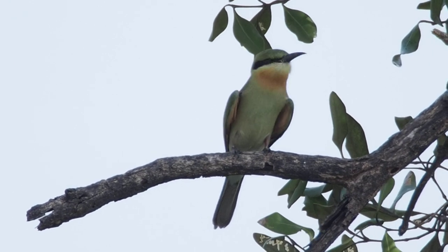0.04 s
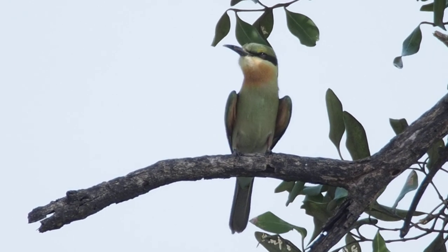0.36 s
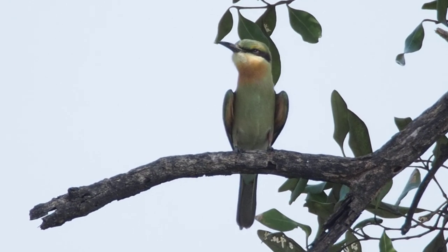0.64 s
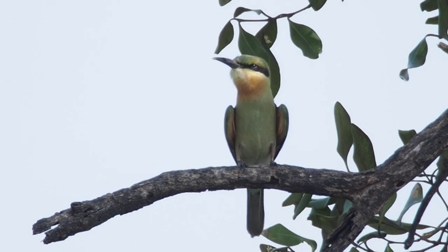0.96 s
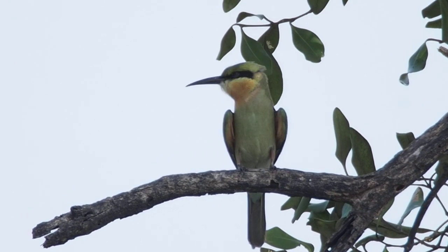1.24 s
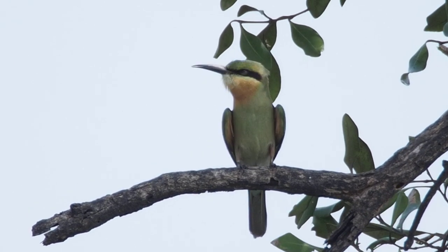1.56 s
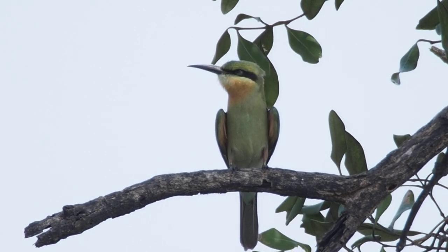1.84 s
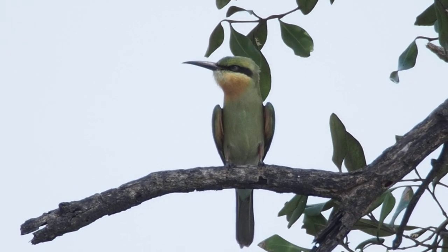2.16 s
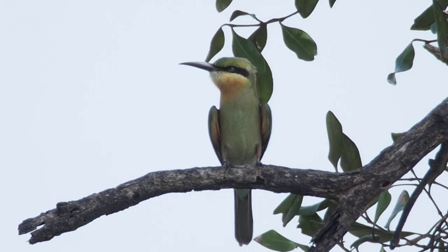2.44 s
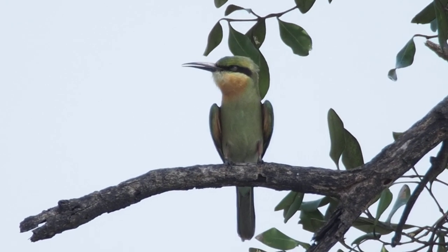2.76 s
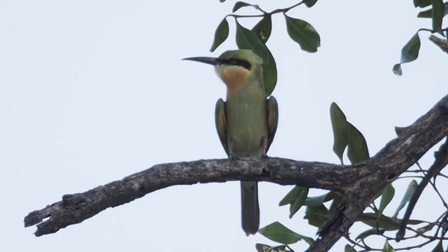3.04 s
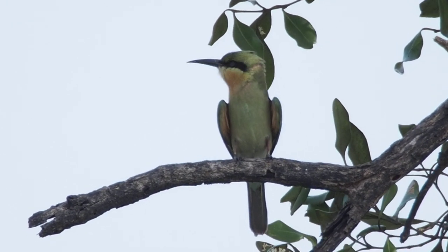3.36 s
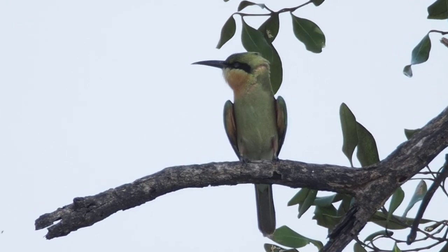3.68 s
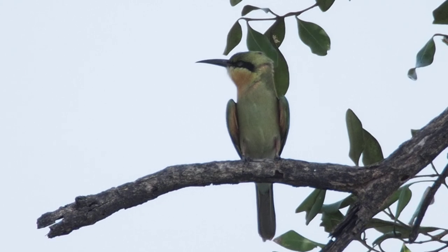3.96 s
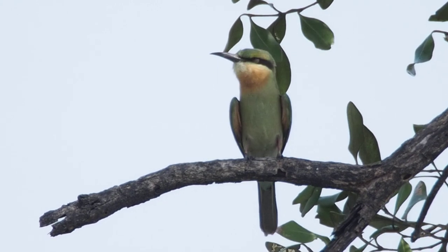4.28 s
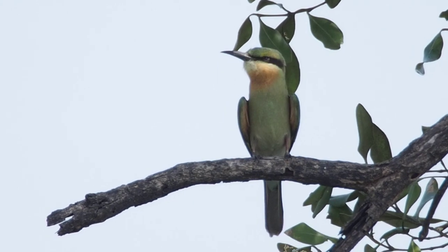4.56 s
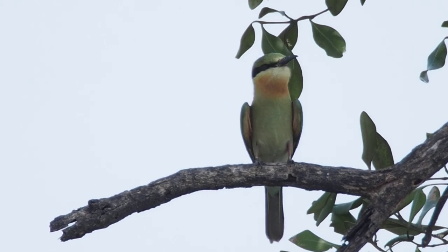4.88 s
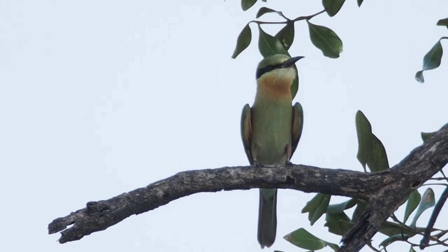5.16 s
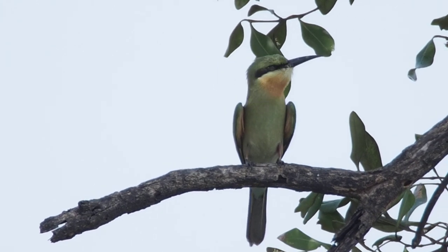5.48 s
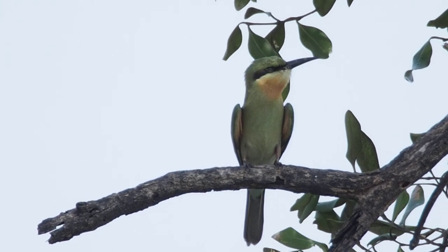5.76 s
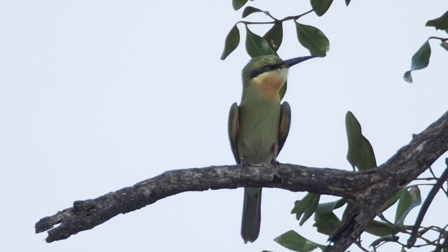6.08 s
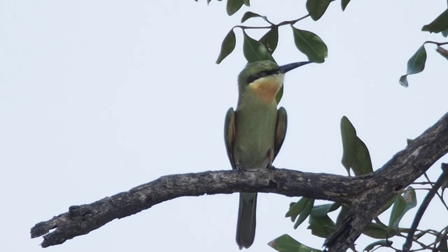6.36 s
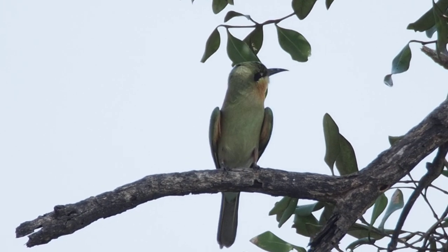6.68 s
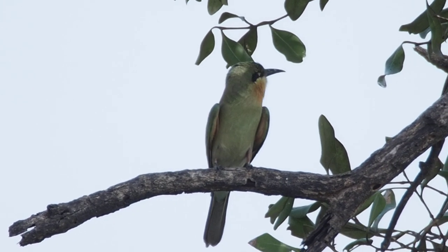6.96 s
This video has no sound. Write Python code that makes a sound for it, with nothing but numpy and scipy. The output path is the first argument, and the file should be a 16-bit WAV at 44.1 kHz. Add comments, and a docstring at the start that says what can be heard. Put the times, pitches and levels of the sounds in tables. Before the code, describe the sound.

A bird whistles short arched calls outdoors while others answer, twitter, rasp and tick over soft wind rumble.

```python
"""Bee-eaters in a tree

A near bird whistles in arches over a soft twitter, a second answers, a third rasps in puffs through its
throat. A small bird on the right ticks in pairs, each tick a tiny whistle; faint chirps come from afar.
Branches throw back short echoes. Gusts rumble, mostly on the right microphone, over a quiet wash."""
import sys
import numpy as np
from scipy import signal
from scipy.fft import rfft, irfft, next_fast_len
from scipy.io import wavfile
from scipy.ndimage import uniform_filter1d

SR = 44100
rng = np.random.default_rng(int(sys.argv[2]) if len(sys.argv) > 2 else 0)


def output_pcm(signal):
    """Save a mono or channel-first signal as 16-bit PCM at the path in sys.argv[1].

    Samples are clipped to [-1, 1] before scaling.
    """
    pcm = np.clip(np.atleast_2d(signal).T, -1, 1) * 32767
    wavfile.write(sys.argv[1], SR, np.round(pcm).astype(np.int16))


N = 318402


def amp(db):
    """Decibels to gain."""
    return 10 ** (np.asarray(db) / 20)


def unit(x):
    """Scales to rms 1."""
    return x / np.sqrt(np.mean(x ** 2) + 1e-20)


def read(points, hz):
    """Interpolates a table on a log-frequency axis."""
    f, value = np.transpose(points)
    return np.interp(np.log(hz + 1), np.log(f + 1), value)


def add(mix, start_s, sound):
    """Mixes a sound in at start_s."""
    part = mix[max(round(start_s * SR), 0):][:len(sound)]
    part += sound[:len(part)]


def drift(count, rate_hz):
    """Smooth random motion of rms about 1, rolling off at rate_hz."""
    hz = np.fft.rfftfreq(count + 4096, 1 / SR)
    white = rfft(rng.standard_normal(count + 4096))
    return unit(irfft(white * np.exp(-(hz / rate_hz) ** 2)))[:count]


def delayed(x, delay_s, fft_size=327680):
    """Fractional-sample delay."""
    hz = np.fft.rfftfreq(fft_size, 1 / SR)
    return irfft(rfft(x, fft_size) * np.exp(-2j * np.pi * hz * delay_s))[:N]


def coloured(spectrum):
    """Two independent noises with a given spectrum."""
    size = next_fast_len(N, True)
    gain = amp(read(spectrum, np.fft.rfftfreq(size, 1 / SR)))
    return unit(irfft(rfft(rng.standard_normal((2, size))) * gain, size)[:, :N])


# Outdoor wash and microphone hiss. Each row: frequency in Hz, relative density in dB.
WASH_SPECTRUM = [(20, -19), (60, 1.5), (105, -3.5), (145, 1), (280, -6.5), (380, -3), (500, -9), (650, -4),
                 (850, -6), (1000, -2), (1300, -14.5), (1750, -8), (3800, -12.5), (6500, -22.5),
                 (12500, -20.5), (16000, -22)]
# Its stereo width. Each row: frequency in Hz, left-right correlation.
WASH_CORRELATION = [(100, 1), (600, 0.33), (2000, 0.033), (6000, 0), (12000, 0.013)]
# Its balance. Each row: frequency in Hz, left minus right in dB.
WASH_PAN = [(100, 10.5), (400, -.5), (2400, .5), (8000, 1), (15000, 1.5)]


def wash(level_db=-54):
    """Steady distant outdoor noise, running into hiss at the top."""
    left, independent = rfft(coloured(WASH_SPECTRUM))
    hz = np.fft.rfftfreq(N, 1 / SR)
    correlation = np.clip(read(WASH_CORRELATION, hz), -1, 1)
    right = correlation * left + np.sqrt(1 - correlation ** 2) * independent
    lean_db = read(WASH_PAN, hz) / 2
    return irfft(np.array([left * amp(lean_db), right * amp(-lean_db)]), N) * amp(level_db)


# Breeze at the microphones. Each row: time in seconds, strength in dB.
BREEZE_CURVE = [(0, -52.5), (.6, -52), (1.0, -61.5), (1.45, -54.5), (1.75, -61), (2.7, -56), (3.2, -46.5),
                (3.7, -48.5), (3.95, -56), (4.15, -49), (4.35, -53), (4.75, -52), (5.2, -46.5), (5.8, -53),
                (6.12, -50.5), (6.65, -58.5), (7.22, -57.5)]
# Gusts on top of it. Each row: start in seconds, relative peak in dB.
GUST_PEAKS = [(0.223, -44), (0.708, -44.5), (2.934, -39), (3.141, -34.5), (3.282, -37.5), (3.379, -43.5),
              (3.456, -37), (3.65, -40.5), (4.068, -39), (4.184, -37), (4.414, -38.5), (4.52, -38),
              (5.0, -38), (5.193, -39), (5.316, -38), (5.515, -37.5)]


def wind_strength_db(lumps_db=1.7, lumps_hz=12, gust_rise_s=.023, gust_trim_db=-5):
    """An uneven breeze, plus gusts that swell quickly and die more slowly."""
    breeze_db = np.interp(np.arange(N) / SR, *np.transpose(BREEZE_CURVE))
    power = amp(breeze_db + lumps_db * drift(N, lumps_hz)) ** 2
    age = np.arange(SR // 2) / SR / gust_rise_s
    for start_s, db in GUST_PEAKS:
        add(power, start_s, (amp(db + gust_trim_db) * age * np.exp(1 - age)) ** 2)
    return 10 * np.log10(power)


# Wind rumble. Each row: frequency in Hz, relative density in dB.
RUMBLE_SPECTRUM = [(20, -27), (45, -10), (70, -2), (115, 0), (170, -4), (250, -15.5), (400, -26.5),
                   (900, -60), (3000, -88)]
# Higher buffeting of hard gusts. Each row: frequency in Hz, relative density in dB.
BUFFET_SPECTRUM = [(60, -18), (200, -1), (400, -12), (900, -28), (3000, -60)]


def wind(left_db=-12, right_db=4, hard_gust_db=-38.5, rumble_slope=1.177, buffet_db=-19, buffet_slope=2.1):
    """Turbulence at each microphone port; hard gusts reach higher in pitch."""
    excess_db = wind_strength_db() - hard_gust_db
    rumble = coloured(RUMBLE_SPECTRUM) * amp(rumble_slope * excess_db)
    buffet = coloured(BUFFET_SPECTRUM) * amp(buffet_db + buffet_slope * excess_db)
    return (rumble + buffet) * amp(hard_gust_db) * amp([[left_db], [right_db]])


def whistle(hz, level_db, waver, second_db, third_db):
    """The syrinx: a slightly unsteady, nearly pure tone with two weak overtones."""
    phase = 2 * np.pi * np.cumsum(hz * (1 + waver * drift(len(hz), 380))) / SR
    tone = np.sin(phase)
    for k, db in [(2, second_db), (3, third_db)]:
        tone += amp(db) * np.sin(k * phase) * (k * hz < SR / 2)
    return np.sqrt(2) * amp(level_db) * tone * signal.windows.tukey(len(hz), .1)


def arch(shape, length_s, top_hz, level_db, fall=1):
    """Stretches an arch over one note: pitch in Hz and level in dB per sample."""
    u = np.linspace(0, 1, max(round(length_s * SR), 64))
    at, pitch, db = np.transpose(shape)
    sag = 1 - uniform_filter1d(np.interp(u, at, pitch), len(u) // 12, mode="nearest")
    past_top = u > u[sag.argmin()]
    return top_hz * (1 - sag * np.where(past_top, fall, 1)), level_db + np.interp(u, at, db)


# Echoes off branches and leaves. Each row: frequency in Hz, T60 in seconds.
TREE_DECAY = [(2000, 0.11), (3500, 0.14), (8000, 0.13)]


def in_tree(x, pan_db, left_lag_s, twigs_db, twigs_decay_s, tail_db):
    """Direct sound (positive pan is left), scatter off the nearest branches and a short leafy tail."""
    direct = np.array([amp(pan_db / 2) * delayed(x, left_lag_s), amp(-pan_db / 2) * x])
    t = np.arange(SR // 3) / SR
    taps = rng.choice([-1., 1.], (2, len(t))) * (rng.random((2, len(t))) < 3000 / SR)  # 3000 echoes/s
    twigs = taps * (t > .006) * np.exp(-t / twigs_decay_s)
    hz, frame_s, spectra = signal.stft(taps * (t > .014), SR, nperseg=256)
    decay = amp(-60 * frame_s / read(TREE_DECAY, hz)[:, None])
    tail = signal.istft(spectra * decay, SR, nperseg=256)[1][:, :len(t)]
    echoes = sum(amp(db) * part / np.linalg.norm(part, axis=1, keepdims=True)
                 for db, part in [(twigs_db, twigs), (tail_db, tail)])
    return direct + signal.oaconvolve(x[None], echoes, axes=1)[:, :N]


# Arch of one tick. Each row: share of length, share of top pitch, relative level in dB.
TICK_SHAPE = [(0, 0.55, -22), (.1, 0.82, -6), (.2, 0.768, -1.5), (.3, 0.8, -5.5), (.42, 1, -14),
              (.56, 0.94, -15), (.7, .92, -17), (.83, 0.9, -9), (1, 0.4, -10)]
# Pairs of ticks. Each row: time in seconds, gap in seconds, level in dB, relative crack level in dB.
DOUBLE_TICKS = [(0.121, .1584, -37.5, -12), (1.4727, 0.16, -40.5, -7), (2.188, .1698, -38, -11),
                (2.959, 0.16, -40, -9), (3.4136, 0.15, -42.5, -15), (3.853, .1624, -41, -12),
                (4.3732, 0.16, -39, -10.5), (5.0621, .1585, -40.5, -23), (6.022, 0.18, -37.5, -18),
                (6.393, 0.17, -40, -14), (6.7436, .1507, -39.5, -19)]


def ticking_bird(length_s=.0088, top_hz=9550, second_tick_db=-.6, crack_rise_s=.0012):
    """Whistles so short and high that they are heard as ticks; the voice cracks on the way up."""
    out = np.zeros(N)
    age = np.arange(400) / SR / crack_rise_s
    band = signal.butter(3, [4300, 9200], "band", fs=SR, output="sos")
    ticks = []
    for time_s, gap_s, db, crack_db in DOUBLE_TICKS:
        ticks += [(time_s, db, crack_db), (time_s + gap_s, db + second_tick_db, crack_db)]
    for (time_s, db, crack_db), (stretch, tune) in zip(ticks, rng.standard_normal((len(ticks), 2))):
        note = arch(TICK_SHAPE, length_s * (1 + .05 * stretch), top_hz * (1 + .0087 * tune), db)
        add(out, time_s - .0009, whistle(*note, waver=.022, second_db=-45, third_db=-50))
        crack = unit(signal.sosfilt(band, rng.standard_normal(len(age)))) * age * np.exp(1 - age)
        add(out, time_s + .0008, amp(db + crack_db) * crack)
    return in_tree(out, pan_db=-5.5, left_lag_s=.00012, twigs_db=-8, twigs_decay_s=.011, tail_db=-21.5)


# Second bird's calls. Each row: start in seconds, length in seconds, top pitch in Hz, level in dB.
ANSWERS = [(0.254, 0.048, 3213, -49), (0.416, 0.046, 3020, -53.5), (2.467, 0.05, 3140, -50.5),
           (3.022, 0.065, 3157, -48.5), (3.517, 0.04, 3010, -51), (4.084, 0.054, 3110, -47.5),
           (4.67, 0.056, 3090, -46), (5.258, .058, 3160, -47.5), (5.775, 0.064, 3240, -47.5),
           (6.329, 0.06, 3130, -45), (6.838, 0.058, 3140, -46.5)]
# Their round arch. Each row: share of length, share of top pitch, relative level in dB.
ANSWER_SHAPE = [(0, .88, -2), (.1, .93, -2.5), (.24, 1, 0.5), (.4, 0.99, -5.5), (.56, 1, 0), (.72, .91, -1),
                (.88, .83, -2), (1, 0.73, -10)]


def answering_bird(full_fall_s=.0638, reflection_s=.0021, reflection_gain=.59):
    """Whistles from the right, the shorter falling less far; a reflection hollows them on the left."""
    out = np.zeros(N)
    for start_s, length_s, top_hz, db in ANSWERS:
        note = arch(ANSWER_SHAPE, length_s, top_hz, db, fall=length_s / full_fall_s)
        add(out, start_s, whistle(*note, waver=.0081, second_db=-51, third_db=-40))
    left, right = in_tree(out, pan_db=-5, left_lag_s=5e-5, twigs_db=-11.5, twigs_decay_s=.0069,
                          tail_db=-19)
    return np.array([left + reflection_gain * delayed(left, reflection_s), right])


def run_times(first_s, last_s, step_s):
    """Evenly spaced starts, about step_s apart."""
    return np.linspace(first_s, last_s, 1 + round(abs(last_s - first_s) / step_s))


def soft_notes(notes, waver, bend, fade_db=3):
    """Quiet whistles gliding through three pitches; a higher bend holds the middle one longer."""
    out = np.zeros(N)
    for start_s, length_s, first_hz, middle_hz, last_hz, db in notes:
        u = np.linspace(-1, 1, max(round(length_s * SR), 64))
        hz = middle_hz + (np.where(u < 0, first_hz, last_hz) - middle_hz) * abs(u) ** bend
        add(out, start_s, whistle(hz, db - fade_db * u ** 2, waver, second_db=-22, third_db=-22))
    return out


# Runs of pips. Each row: first start in seconds, last start in seconds, level in dB.
TWITTER_PIPS = [(0.484, 0.484, -58.5), (1.098, 1.14, -61.5), (1.552, 1.594, -57), (2.024, 2.072, -60),
                (2.888, 2.934, -59.5), (3.632, 3.668, -60), (4.277, 4.369, -61.5), (4.909, 4.995, -60.5),
                (7.078, 7.114, -61)]


def pips(step_s=.044, length_s=.023, low_hz=2142, high_hz=2253, flick_hz=160):
    """Low whistled pips, each a shallow dip in pitch, sinking a little along the run."""
    notes = []
    for first_s, last_s, db in TWITTER_PIPS:
        starts_s = run_times(first_s, last_s, step_s)
        for start_s, hz in zip(starts_s, np.linspace(low_hz, high_hz, len(starts_s))[::-1]):
            notes.append((start_s, length_s, hz + flick_hz, hz, hz + flick_hz, db))
    return soft_notes(notes, waver=.017, bend=2.9, fade_db=1.5)


# Endings of most runs. Each row: turn in seconds, low and top pitch in Hz, rise and fall level in dB.
TWITTER_FLOURISHES = [(0.542, 2240, 2920, -53.5, -52), (1.209, 2210, 2850, -55, -55),
                      (1.692, 2330, 2600, -53, -55.5), (2.171, 2298, 2350, -51.5, -54),
                      (3.012, 2200, 2700, -54.5, -59), (3.729, 2150, 2820, -55, -59),
                      (5.064, 2100, 2710, -57.5, -59.5), (7.174, 2190, 2890, -56.5, -52.5)]
# Their contour. Each row: share of length, share of the way from low to top, relative level in dB.
FLOURISH_CONTOUR = [(0, .2, -4), (.08, 0, 0), (.3, .14, 0), (.4, .9, -1), (.5, 1, -9), (.56, .85, -2),
                    (.62, .32, 1), (.78, .26, 1), (1, -.08, -4)]


def flourishes(length_s=.058):
    """A held low whistle flicks up, catches at the turn and slides back."""
    out = np.zeros(N)
    u = np.linspace(0, 1, round(length_s * SR))
    at, height, shape_db = np.transpose(FLOURISH_CONTOUR)
    for turn_s, low_hz, top_hz, rise_db, fall_db in TWITTER_FLOURISHES:
        hz = low_hz + (top_hz - low_hz) * np.interp(u, at, height)
        db = np.interp(u, at, shape_db) + np.where(u < .5, rise_db, fall_db)
        add(out, turn_s - length_s / 2, whistle(hz, db, waver=.012, second_db=-30, third_db=-27))
    return out


def twitter():
    """Low, clear phrases between the whistles: a few pips, then usually a flourish."""
    phrases = pips() + flourishes()
    return in_tree(phrases, pan_db=-1, left_lag_s=0, twigs_db=-19, twigs_decay_s=.016, tail_db=-11)


# Far-off chatter. Each row: first start in seconds, last start in seconds, level in dB.
CHATTER_RUNS = [(0.712, 0.793, -73), (1.205, 1.286, -73), (1.551, 1.629, -66.5)]


def distant_chatter(step_s=.02, length_s=.015, glide_hz=(7220, 6120, 4560)):
    """Short runs of thin, high, falling whistles."""
    notes = [(start_s, length_s, *glide_hz, db)
             for first_s, last_s, db in CHATTER_RUNS for start_s in run_times(first_s, last_s, step_s)]
    chatter = soft_notes(notes, waver=.009, bend=1.03)
    return in_tree(chatter, pan_db=4, left_lag_s=0, twigs_db=-6, twigs_decay_s=.006, tail_db=-15)


# Near bird's calls. Each row: start and length in seconds, top pitch in Hz, level in dB, fall factor.
NEAR_WHISTLES = [(0.942, 0.073, 3277, -37, 1.05), (1.471, 0.074, 3350, -36, 0.99),
                 (1.935, 0.075, 3353, -35.5, 1.14), (2.801, 0.071, 3316, -36.5, 1.18),
                 (3.461, 0.079, 3287, -38, 0.97), (4.141, 0.077, 3290, -40, 1.05),
                 (4.808, 0.073, 3262, -36, 1.18), (6.877, 0.063, 2925, -40, 0.87)]
# Their quick rise and long fall. Each row: share of length, share of top pitch, relative level in dB.
NEAR_SHAPE = [(0, .77, -10.5), (.1, .9, -9.5), (.22, .985, -6.5), (.35, 1, -2.5), (.52, .94, -5),
              (.68, .85, -5), (.86, 0.78, -17.5), (1, 0.788, -13)]


def near_bird(bough_s=.012, bough_db=-14):
    """Loud arched whistles that turn hoarse as they fall; an echo off a bough beats against them."""
    out = np.zeros(N)
    for start_s, *note in NEAR_WHISTLES:
        hz, db = arch(NEAR_SHAPE, *note)
        third_db = np.interp(hz, [2500, 2850, 3150], [-30, -21.5, -34])  # the beak favours 8.5 kHz
        flutter_db = 3.5 * np.linspace(0, 1, len(hz)) ** 2 * drift(len(hz), 400)
        add(out, start_s, whistle(hz, db + flutter_db, waver=.0013, second_db=-35, third_db=third_db))
    out += amp(bough_db) * delayed(out, bough_s)
    return in_tree(out, pan_db=-2.5, left_lag_s=-1.7e-5, twigs_db=-13.5, twigs_decay_s=.0059,
                   tail_db=-16.5)


# Third bird's harsh notes. Each row: start in seconds, centre in Hz, level in dB.
RASP_NOTES = [(2.089, 2410, -49), (2.356, 3340, -50.5), (2.670, 2540, -44.5), (2.776, 3103, -45),
              (2.826, 2540, -47.5), (3.051, 2570, -45), (3.148, 3200, -49), (3.194, 2580, -47),
              (3.415, 2500, -45.5), (3.525, 3127, -49), (3.573, 2550, -47.5), (3.764, 2580, -47),
              (3.870, 3200, -51), (3.923, 2620, -48.5)]


def rasping_bird(length_s=.055, pulse_hz=300, jitter=.14, core_hz=850, skirt_hz=2200, skirt_db=-8):
    """Uneven puffs, some hundreds a second, through one resonance of the throat."""
    out = np.zeros(N)
    count = round(length_s * SR)
    for start_s, centre_hz, db in RASP_NOTES:
        cycles = np.cumsum(pulse_hz * (1 + jitter * drift(count, 200))) / SR
        puffs = np.exp(-2 * (cycles % 1)) * rng.standard_normal(count)
        rasp = np.zeros(count)
        for width_hz, band_db in [(core_hz, 0), (skirt_hz, skirt_db)]:
            edges_hz = [centre_hz - width_hz / 2, centre_hz + width_hz / 2]
            band = signal.butter(3, edges_hz, "band", fs=SR, output="sos")
            rasp += amp(band_db) * unit(signal.sosfilt(band, puffs))
        rasp /= np.sqrt(uniform_filter1d(rasp ** 2, size=400) + 1e-9)  # steady effort evens the puffs
        add(out, start_s, amp(db) * unit(rasp * signal.windows.tukey(count, .34)))
    return in_tree(out, pan_db=5.5, left_lag_s=-.00013, twigs_db=-13.5, twigs_decay_s=.0057,
                   tail_db=-17.5)


# Far-off chirps. Each row: start and length in seconds, first, middle and last pitch in Hz, level in dB.
STRAY_CHIRPS = [(4.300, 0.045, 3480, 3760, 3850, -67), (5.990, 0.04, 3330, 3220, 3100, -66.5),
                (6.090, 0.025, 2280, 2480, 2580, -61.5)]


def distant_chirps():
    """Faint gliding whistles, heard mostly as scatter off branches."""
    chirps = soft_notes(STRAY_CHIRPS, waver=.018, bend=1.24)
    return in_tree(chirps, pan_db=-1, left_lag_s=0, twigs_db=2.5, twigs_decay_s=.0062, tail_db=-12)


def scene():
    """All birds over the wash and the wind."""
    bee_eaters = near_bird() + answering_bird() + twitter() + rasping_bird()
    return bee_eaters + ticking_bird() + distant_chirps() + distant_chatter() + wash() + wind()


def record(dry):
    """The recorder's band limit."""
    cutoff_hz = 15900
    lowpass = signal.firwin(511, cutoff_hz, window=("kaiser", 9), fs=SR)
    return signal.oaconvolve(dry, lowpass[None], "same")


dry = scene()
out = record(dry)
output_pcm(out)
```